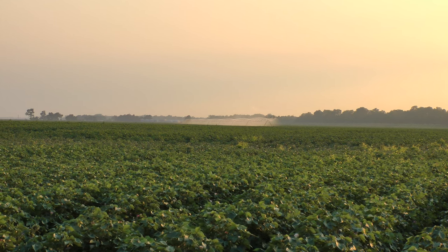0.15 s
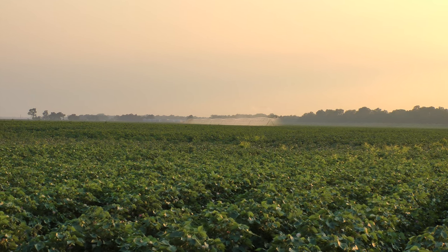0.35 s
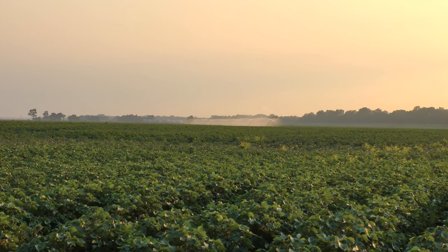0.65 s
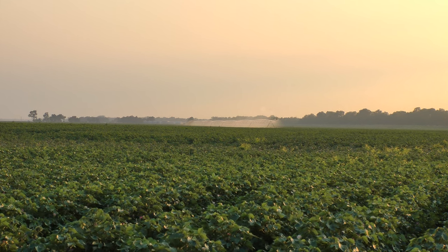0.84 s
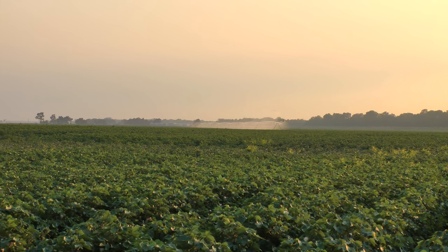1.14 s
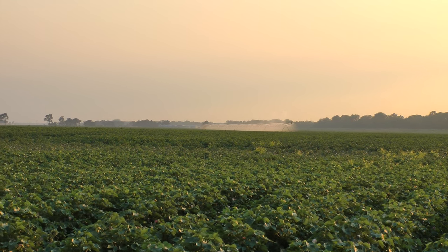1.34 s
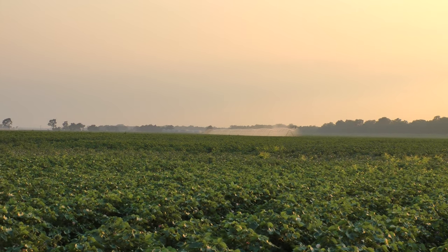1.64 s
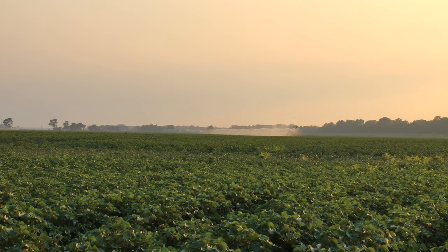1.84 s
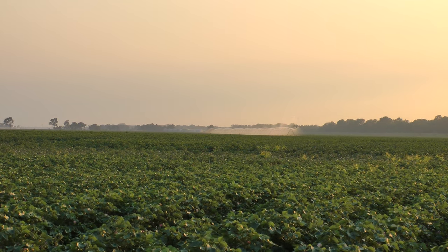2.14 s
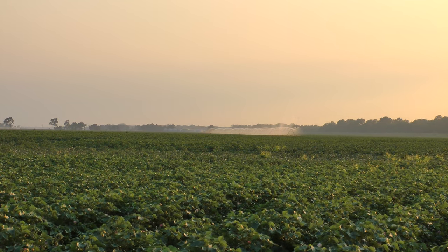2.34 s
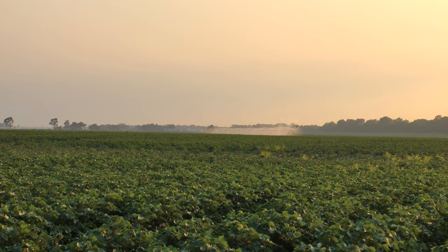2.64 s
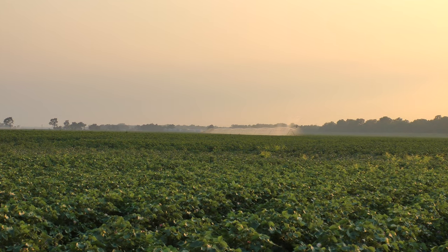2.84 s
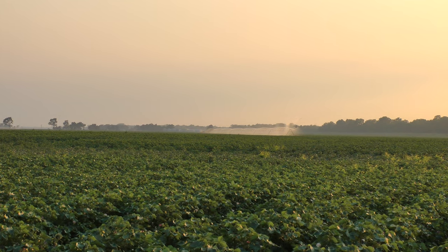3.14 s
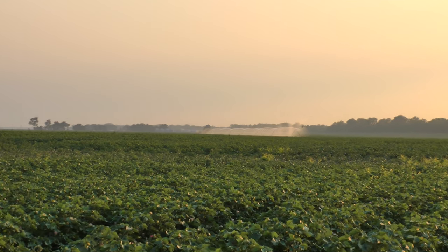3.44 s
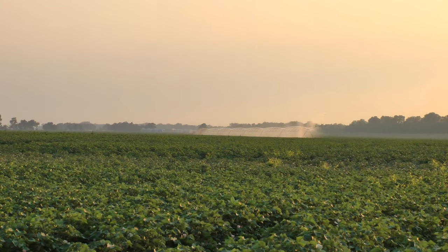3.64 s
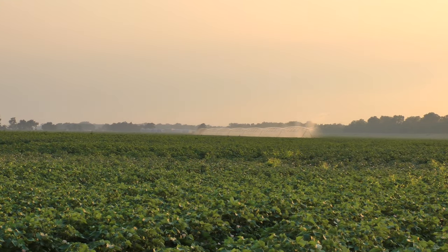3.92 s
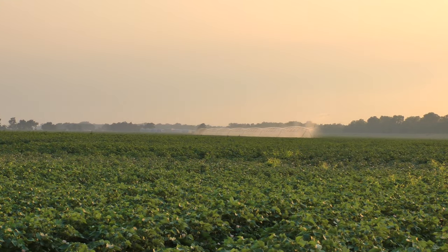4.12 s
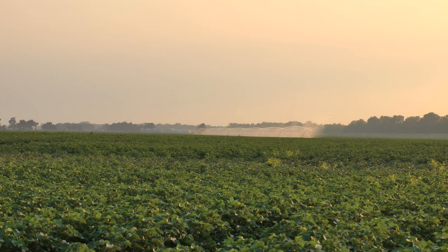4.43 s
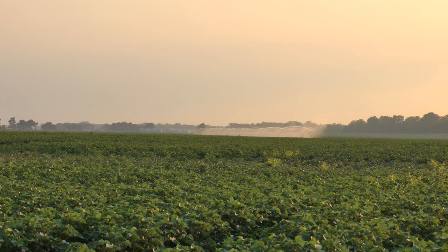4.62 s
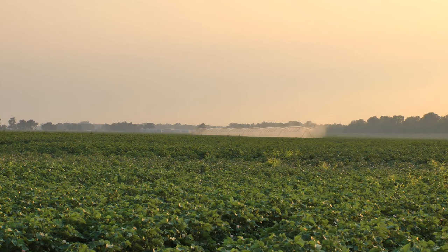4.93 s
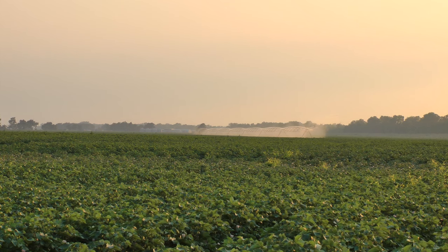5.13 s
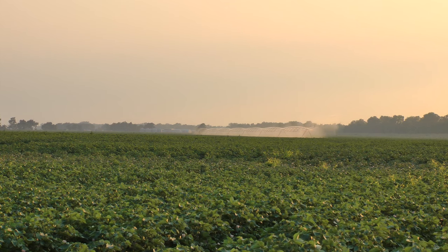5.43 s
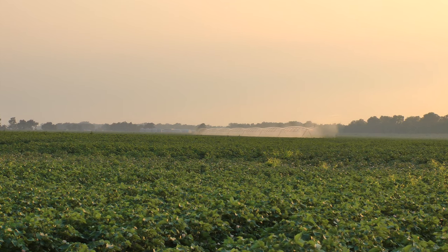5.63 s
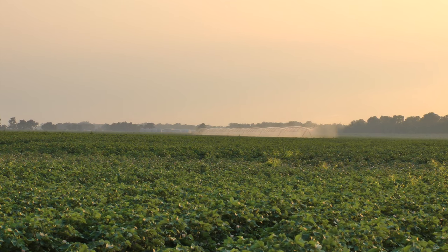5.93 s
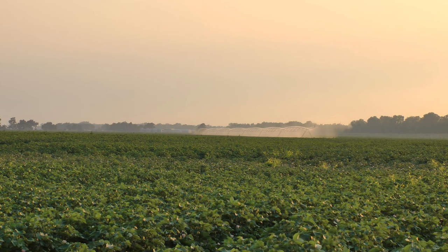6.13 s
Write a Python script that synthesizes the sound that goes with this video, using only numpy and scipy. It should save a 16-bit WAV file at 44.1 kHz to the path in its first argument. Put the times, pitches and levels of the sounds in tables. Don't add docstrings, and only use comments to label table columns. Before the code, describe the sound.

Wind gusts buffet the microphone with deep, thudding rumble over an open field, while faint birds trill and a distant diesel pump drones.

```python
import sys
import numpy as np
from scipy import signal
from scipy.io import wavfile
from scipy.ndimage import uniform_filter1d

SR = 44100
rng = np.random.default_rng(int(sys.argv[2]) if len(sys.argv) > 2 else 0)


def attenuation_scalar(level_db):
    decades = np.asarray(level_db, float) / 20
    return 10 ** decades


def wrap_up_sound(samples):
    columns = np.atleast_2d(samples).T
    tamed = np.clip(columns, -1, 1)
    steps = np.round(tamed * 32767).astype(np.int16)
    wavfile.write(sys.argv[1], SR, steps)


N = 276507
TIME = np.arange(N) / SR


def level(x, db):
    return x * attenuation_scalar(db) / np.sqrt(np.mean(x ** 2))


def band(x, lo_hz, hi_hz, order):
    return signal.sosfilt(signal.butter(order, [lo_hz, hi_hz], "bandpass", fs=SR, output="sos"), x)


def ring(x, hz, width_hz):
    return signal.lfilter(*signal.iirpeak(hz, hz / width_hz, fs=SR), x)


def walk(rate_hz):
    hold = int(SR / rate_hz)
    steps = np.repeat(rng.standard_normal(N // hold + 1), hold)
    return 0.53 * uniform_filter1d(uniform_filter1d(steps, hold), hold)[:N]


def add(out, s, sound):
    i = int(s * SR)
    out[i:i + len(sound)] += sound[:N - i]


# (t/s, level/dB)
WIND = [(0, -40.5), (.25, -35), (.55, -36), (1.05, -28), (1.3, -23.5), (1.75, -24.5), (2.0, -27.5),
        (2.3, -23.5), (2.5, -27.5), (2.8, -22), (3.0, -38), (3.15, -23.5), (3.65, -28), (3.92, -47),
        (4.6, -39), (5.0, -29.5), (5.5, -33), (6.27, -34.5)]
# (t/s, length/s, peak level/dB, eddy f/Hz)
PUFFS = [(0, 0.035, -50, 160), (0.28, .08, -25.5, 30), (0.452, 0.11, -23.5, 30), (1.13, 0.054, -29.5, 80),
         (1.206, 0.087, -23.5, 35), (1.376, 0.049, -18.5, 54.2), (1.505, 0.035, -15, 28),
         (1.614, 0.056, -20.5, 94), (1.64, 0.044, -11, 40), (1.647, 0.074, -31.5, 150),
         (1.728, 0.075, -20, 90), (1.8, .05, -49, 150), (2.145, 0.075, -11.5, 34.7),
         (2.39, 0.057, -15.5, 73), (2.644, 0.075, -20.5, 46.3), (2.842, 0.026, -24.5, 150),
         (2.903, 0.046, -4.5, 30), (3.033, .05, -43, 170), (3.236, 0.066, -22, 45.6),
         (3.365, 0.052, -24, 86), (3.554, 0.12, -20, 35), (4.224, 0.097, -34.5, 83),
         (4.406, 0.057, -25, 28), (4.64, 0.055, -39, 77), (4.73, 0.046, -26, 28), (4.853, 0.052, -23, 80),
         (5.088, 0.032, -23, 50.5), (5.318, 0.14, -18, 44), (6.0, 0.047, -30, 40), (6.11, 0.04, -35, 79)]


def stirring(hz, trim_db, gain):
    below_db, above_db = 9.5, 25.5
    t = TIME[::64]
    wind_db = np.interp(t, *np.transpose(WIND))
    power = attenuation_scalar(2 * (trim_db - 29 + gain * (wind_db + 29.5)))
    for s, length, db, puff_hz in PUFFS:
        slope_db = above_db if hz > puff_hz else below_db
        off_db = slope_db * np.log2(hz / puff_hz) ** 2
        power = power + attenuation_scalar(2 * (db - off_db)) * np.exp(-(2 * (t - s) / length) ** 2)
    return np.interp(TIME, t, np.sqrt(power))


CEILING = .27
# (t/s, sign, level over the ceiling/dB, f/Hz)
SLAMS = [(1.129, 1, .3, 80), (1.193, -1, 2, 45), (1.2774, -1, 4.5, 50), (1.5125, 1, 5, 45),
         (1.6335, -1, 3.5, 100), (1.6398, 1, 4.5, 40), (1.7011, -1, 1.5, 65), (1.832, -1, 4, 45),
         (2.1163, 1, .5, 45), (2.1748, -1, 1.5, 50), (2.2961, -1, 4, 45), (2.3542, -1, 6, 70),
         (2.3889, -1, 7.5, 50), (2.415, -1, 7, 45), (2.552, -1, 3.5, 50), (2.794, 1, .5, 50),
         (2.8353, 1, 3, 50), (2.8443, -1, 9, 60), (2.872, -1, 9, 60), (2.9091, -1, 9, 45),
         (2.9231, 1, 10, 50), (3.081, -1, 6, 60), (3.2204, -1, 3, 55)]


def slams():
    wave, crowd = np.zeros(N), np.zeros(N)
    t = np.arange(-2000, 2000) / SR
    for s, sign, over_db, hz in SLAMS:
        bell = np.exp(-(t * hz / .3) ** 2)
        add(wave, s + t[0], sign * CEILING * attenuation_scalar(over_db) * bell * np.cos(2 * np.pi * hz * t))
        add(crowd, s + t[0], bell ** .25)
    return wave, np.clip(crowd, 0, 1)


def limiter():
    wave, _ = slams()
    need_db = np.minimum(0, 20 * np.log10(CEILING / (np.abs(wave) + 1e-9)))
    climb_db = 30 * TIME
    return attenuation_scalar(climb_db + np.minimum.accumulate(need_db - climb_db))


# (low f/Hz, high f/Hz, trim level/dB, dB gained per dB of wind)
EDDIES = [
    (16.2, 50.6, 2.5, 0.64),
    (56, 107.9, -7.5, 1.06),
    (124.6, 204.4, -32, 1.9),
]


def buffet():
    out = 0
    for lo, hi, trim_db, gain in EDDIES:
        gusty = rng.standard_normal(N) * attenuation_scalar(3.4 * walk(40))
        eddy = level(band(gusty, lo, hi, order=3), 0)
        span = int(3.5 * SR / lo)
        power = uniform_filter1d(uniform_filter1d(eddy ** 2, span), span)
        strength = stirring(np.sqrt(lo * hi), trim_db, gain)
        out = out + eddy / np.sqrt(power + 0.01) * strength
    spray = band(rng.standard_normal(N) * attenuation_scalar(3.5 * walk(60)), 170, 290, order=3)
    out = out + level(spray, -13.5) * strength
    wave, crowd = slams()
    return out * (1 - .9 * crowd) / limiter() + wave


CYCLE_HZ = 14.181
CYLINDERS_DB = [13, 9, 4, 3]
# (multiple of the cycle, rms level/dB)
EXHAUST = [(4, -31), (8, -36.5), (34, -63), (35, -66), (45, -75), (62.25, -75)]
# (f/Hz, width/Hz, level/dB)
BLOCK = [(312.3, 22, -8.5), (363, 8.8, -16), (620, 40, -26.5), (877, 35, -19.5), (1094, 63, -9),
         (1810, 210, -11.5), (2370, 110, -19.5), (3790, 410, -15.5),
         (488, 26, -1), (736, 18, -13)]
# (t/s, level/dB)
PUMP_SWELL = [(0, -1.5), (1, 3.5), (2, 1), (3, 3), (4, 0), (5, 1.5), (6.27, -4)]


def pump():
    turn = CYCLE_HZ * TIME + 0.0014 * walk(1.8)
    orders = 0
    for k, db in EXHAUST:
        orders = orders + np.sqrt(2) * attenuation_scalar(db) * np.sin(2 * np.pi * k * turn)
    tones = attenuation_scalar(0.56 * walk(5.9)) * orders

    cylinders = len(CYLINDERS_DB)
    count = int(N / SR * CYCLE_HZ * cylinders)
    jitter, unevenness = rng.standard_normal((2, count))
    at_s = np.arange(count) / cylinders / CYCLE_HZ + .00015 * jitter + .001
    knocks = np.zeros(N + SR)
    knocks[(at_s * SR).astype(int)] = attenuation_scalar(np.resize(CYLINDERS_DB, count) + 2.5 * unevenness)
    drive = level(knocks[:N], 0) + .6 * rng.standard_normal(N)

    block = 0
    for k, (hz, width, db) in enumerate(BLOCK):
        mode = ring(ring(drive, hz, width), hz, 2 * width)
        block = block + (-1) ** k * attenuation_scalar(db) * level(mode, 0)
    sway = attenuation_scalar(np.interp(TIME, *np.transpose(PUMP_SWELL)) + walk(4))

    whine_hz, whine_from_s = 52 * CYCLE_HZ, 3.3
    whine = level(ring(ring(rng.standard_normal(N), whine_hz, 19.0), whine_hz, 45.0), 0)
    fade = np.clip((TIME - whine_from_s) / 0.3, 0, 1)
    tones = tones + attenuation_scalar(-66 + 4.2 * walk(9.1)) * fade * whine
    return tones + level(block, -61) * sway


# (f/Hz, level per Hz/dB)
FIELD = [(100, -38), (170, -11), (398, -11.5), (481, -14.5), (548, -8.5), (663, -11.5), (728, -9.5),
         (949, -21.5), (1060, -15), (1440, -34.5), (1840, -12.5), (2100, -19.5), (3770, -23), (5820, -34.5),
         (15500, -34.5)]


def field():
    out, swell = 0, walk(0.57)
    hz_at, db_at = np.transpose(FIELD)
    for hz in 170 * 2 ** np.arange(0, 6.7, 1 / 3):
        db = np.interp(np.log(hz), np.log(hz_at), db_at) + .5 * swell + 1.1 * walk(9)
        out = out + attenuation_scalar(db) * band(rng.standard_normal(N), hz / 1.145, hz * 1.214, order=2)
    return level(out, -58)


# (t/s, length/s, level/dB, centre f/Hz)
RUSTLES = [
    (0.072, 0.015, -68, 10900),
    (2.127, 0.28, -74, 6460),
    (3.685, 0.066, -66, 4370),
    (4.397, 0.13, -64.5, 3800),
    (4.384, 0.044, -79, 7500),
    (4.557, 0.071, -75, 5000),
    (5.194, 0.1, -62.5, 3270),
    (5.967, 0.087, -70, 5300),
    (6.149, .1, -66.5, 4460),
]


def rustles():
    out = np.zeros(N)
    for s, length, db, hz in RUSTLES:
        grains = rng.standard_normal(SR // 4) * attenuation_scalar(3 * rng.exponential(size=SR // 4))
        wide = band(grains, hz / 1.7, min(hz * 1.45, 16000), order=2)
        size = int(min(1.5 * length, .24) * SR)
        add(out, s - length / 4 * (s > .1), level(wide, db + 2)[:size] * np.hanning(size))
    return out


def trill(runs, beat_s, second_db):
    second_s, db_scatter, pitch_scatter = .0205, 2, .016
    notes = []
    for first, last, db, hz in runs:
        for s in np.linspace(first, last, round((last - first) / beat_s) + 1):
            for delay_s, change_db in ((0, 0), (second_s, second_db)):
                a, b = rng.standard_normal(2)
                notes.append((s + delay_s, db + change_db + db_scatter * a, hz * (1 + pitch_scatter * b)))
    return notes


# (first t/s, last t/s, peak level/dB, f/Hz)
QUICK_TRILLS = [
    (1.715, 1.948, -52, 3950),
    (1.8, 1.955, -57, 4650),
    (1.676, 1.977, -58, 3120),
    (3.408, 3.557, -55, 3830),
    (3.86, 4.246, -54, 3830),
    (3.9, 4.205, -59, 4900),
    (3.95, 4.25, -62, 4650),
    (4.709, 4.943, -58, 4560),
    (4.653, 4.976, -60, 3130),
]
# (first t/s, last t/s, peak level/dB, f/Hz)
SLOW_TRILLS = [
    (1.369, 1.466, -54, 3750),
    (2.625, 2.814, -57, 3750),
    (3.048, 3.315, -53, 3790),
    (3.124, 3.305, -57, 4850),
    (3.177, 3.27, -63, 5400),
    (4.529, 4.81, -56, 3730),
]
# (first t/s, last t/s, peak level/dB, f/Hz)
HELD_RUNS = [
    (1.692, 1.921, -55, 4050),
    (3.865, 4.09, -62, 3680),
    (2.13, 2.13, -60, 4650),
    (2.24, 2.24, -59, 4480),
    (4.195, 4.195, -58, 4250),
    (4.91, 4.91, -57, 4150),
    (3.31, 3.47, -60, 3750),
]
# (t/s, peak level/dB, f/Hz)
LONE_NOTES = [(.428, -62, 4550), (1.086, -64.5, 5600), (2.16, -63, 6300), (3.2, -66, 5940),
              (3.3, -64, 6050), (4.14, -60, 5300), (4.215, -59, 5240), (.627, -62, 3780), (.854, -58, 3500),
              (1.046, -56, 3180), (1.12, -62, 3300), (1.984, -63, 4240), (2.193, -58, 3900),
              (2.349, -55.5, 3670), (2.678, -56, 3420), (3.44, -63, 4670), (3.728, -56, 4360),
              (4.346, -58, 3330)]
# (t/s, level/dB, highest f/Hz)
CHORUS = [(0, -90, 4200), (.55, -66, 4040), (1.0, -60, 4180), (1.3, -64.5, 4080), (1.9, -62, 4750),
          (2.1, -67.5, 4740), (2.75, -61, 4250), (3.28, -59, 5660), (3.7, -63, 4340), (4.2, -59, 5470),
          (4.32, -68, 4320), (4.7, -60, 4520), (4.92, -59, 4790), (5.05, -70, 4200), (6.27, -60, 4200)]


def birds():
    out = np.zeros(N)
    when, softness, pitch = rng.random((3, 900))
    when = when * N / SR
    s, chorus_db, top_hz = np.transpose(CHORUS)
    far_db = np.interp(when, s, chorus_db) - 3 * softness
    far_hz = 3300 + pitch * (np.interp(when, s, top_hz) - 3300)
    far = np.transpose([when, far_db, far_hz])

    quick_s, slow_s = .0775, .091
    # (notes, length in s, relative fall in pitch, trim in dB)
    voices = (
        (trill(QUICK_TRILLS, quick_s, -2), .012, .15, -1.5),
        (trill(SLOW_TRILLS, slow_s, -2), .012, .15, -1.5),
        (trill(HELD_RUNS, quick_s, -14), .028, .06, -1.5),
        (LONE_NOTES, .013, .13, -1.5),
        (far, .009, .12, -2.5),
    )
    for notes, length, fall, trim_db in voices:
        for s, db, hz in notes:
            bend, flutter, stretch = .7 + .6 * rng.random(3)
            u = np.linspace(0, 1, int(length * stretch * SR))
            sweep_hz = hz * (1 + fall * bend * (.5 - u))
            rough = 1 + .4 * np.cos(2 * np.pi * 2.5 * flutter * u)
            shape = np.sin(np.pi * u) ** 1.5 * rough
            whistle = np.sin(2 * np.pi * np.cumsum(sweep_hz) / SR)
            add(out, max(s - .004, 0), attenuation_scalar(db + trim_db) * shape * whistle)
    tail = rng.standard_normal(3000) * np.exp(-np.arange(3000) / (.015 * SR))
    return out + attenuation_scalar(-31) * signal.fftconvolve(out, tail)[:N]


# (t/s, step level/dB, dull body level/dB)
CRACKS = [(1.193, -49, -46), (1.2763, -44, -51), (1.5117, -45, -34), (1.6328, -53.5, -37.5),
          (1.701, -58, -35.5), (1.83, -56, -53), (2.174, -53.5, -34), (2.296, -46, -41),
          (2.353, -52, -42.5), (2.3895, -53, -49), (2.462, -50.5, -51), (2.8358, -32.5, -37.5),
          (2.8419, -56.5, -21), (2.8715, -53, -44), (2.9092, -48.5, -37.5)]


def cracks():
    out = np.zeros(N)
    t = np.arange(900) / SR
    step = (1 - np.exp(-t / .0001)) * np.exp(-t / .002)
    thump = 4 * (t / .0008) * np.exp(-t / .0008) * np.cos(2 * np.pi * 180 * t)
    for s, db, thump_db in CRACKS:
        add(out, s, -attenuation_scalar(db + 4) * step - attenuation_scalar(thump_db) * thump)
    return out


TICK_S = [
    3.6642,
    3.6662,
    3.6679,
    3.6702,
    3.6735,
]
TICK_DB = [-35.5, -14, -32, -24, -41]
# (f/Hz, level/dB, 60 dB decay time/s)
HOUSING = [(380, 5.5, 0.0078), (860, -10, 0.036), (1163, 0.5, 0.027), (1480, -0.5, 0.022),
           (1950, 5, 0.0059), (2500, 2, 0.0039), (3270, 5.5, 0.0057), (3870, 1.5, 0.034), (4370, -2, 0.011),
           (5650, -14, 0.0067), (8200, -20, .004), (11500, -14, .003)]


def tick():
    out, t = np.zeros(N), np.arange(3000) / SR
    rings = 0
    for k, (hz, db, t60) in enumerate(HOUSING):
        rings = rings + (-1) ** k * attenuation_scalar(db - 60 * t / t60) * np.sin(2 * np.pi * hz * t)
    onset = 1 - np.exp(-t / .00025)
    for s, db in zip(TICK_S, TICK_DB):
        noise = band(rng.standard_normal(len(t)), 1400, 3000, order=2)
        snap = level(noise, -2.8) * np.exp(-t / 0.0018)
        add(out, s, attenuation_scalar(db - 17) * (rings + snap) * onset)
    return out


def scene():
    return (buffet() + pump() + field() + rustles() + birds() + tick())[None]


def band_limit(x):
    return signal.sosfilt(signal.butter(12, 15690, fs=SR, output="sos"), x)


def record(dry):
    held = 0.44 * np.tanh(dry * limiter() / 0.4) + cracks()
    bass_block = signal.butter(1, 12, "highpass", fs=SR, output="sos")
    mix = signal.sosfilt(bass_block, held)
    return band_limit(mix)


dry = scene()
out = record(dry)
wrap_up_sound(out)
```